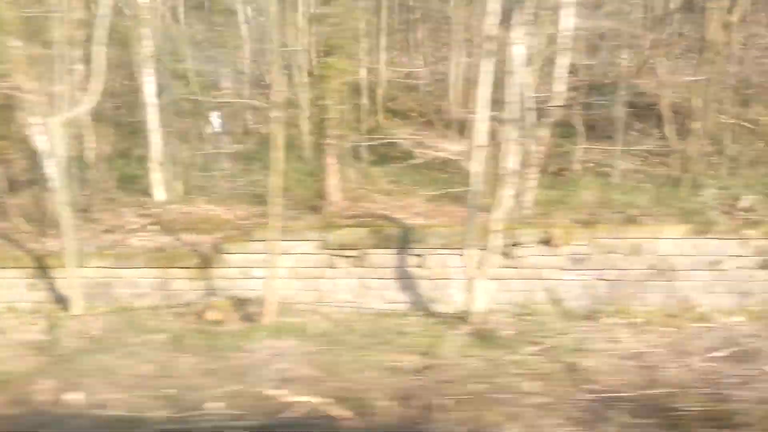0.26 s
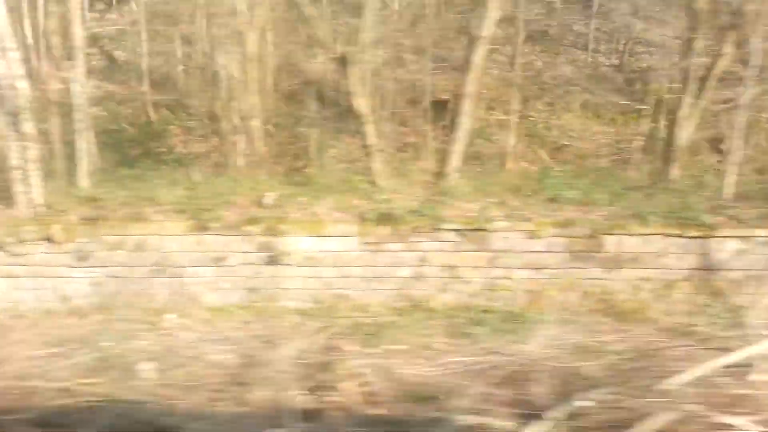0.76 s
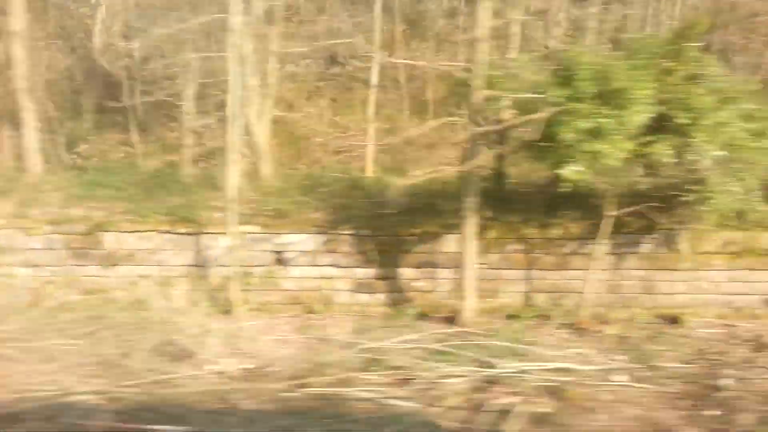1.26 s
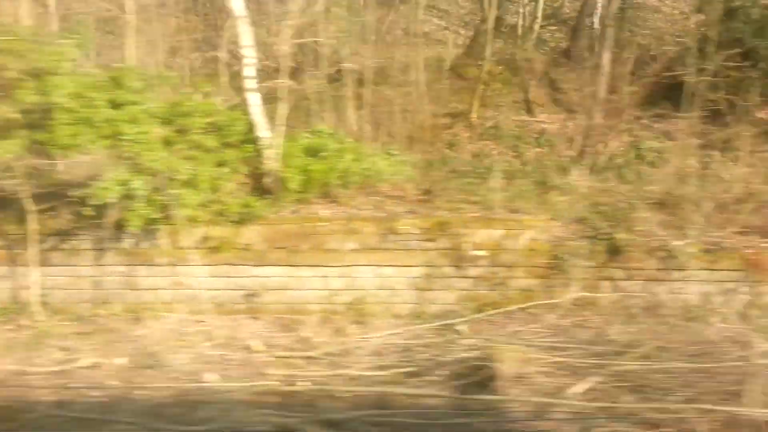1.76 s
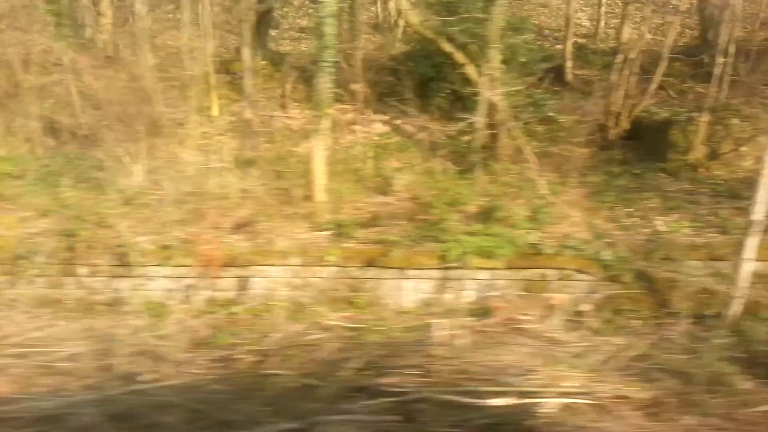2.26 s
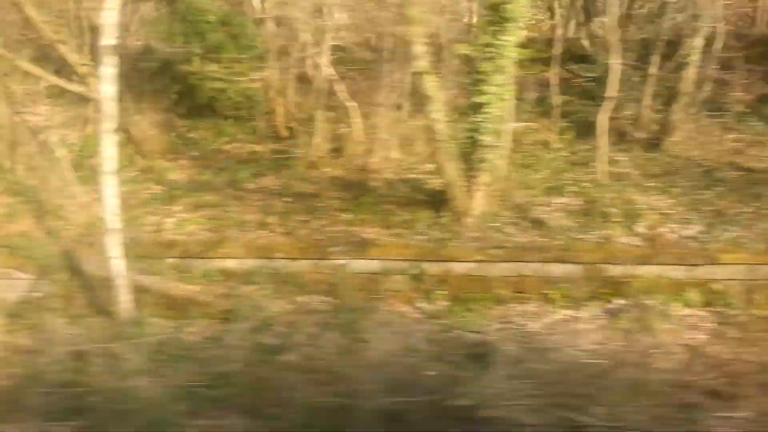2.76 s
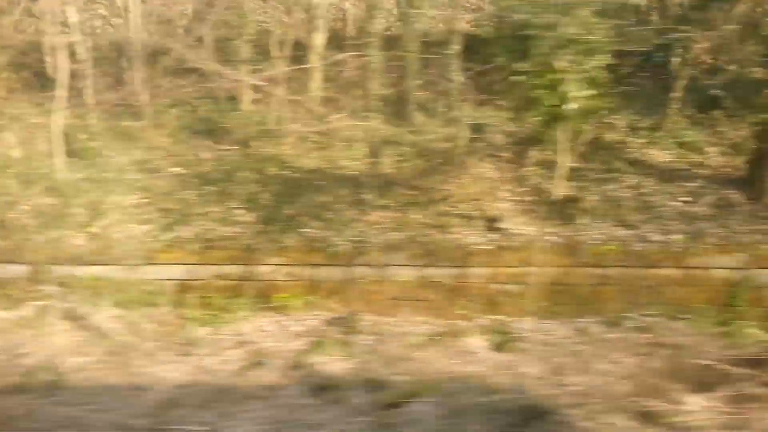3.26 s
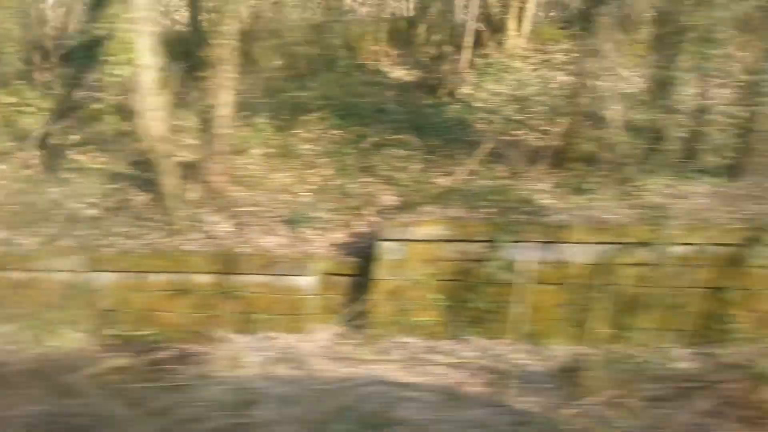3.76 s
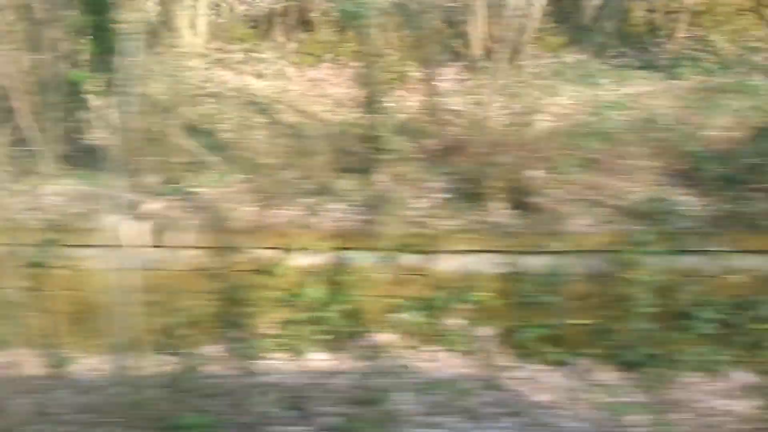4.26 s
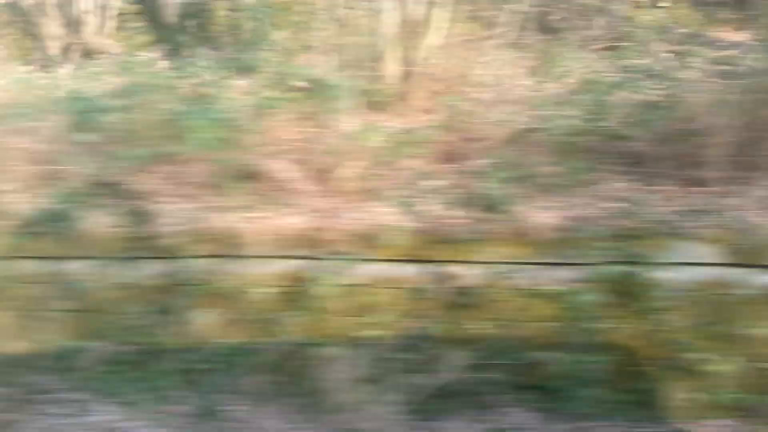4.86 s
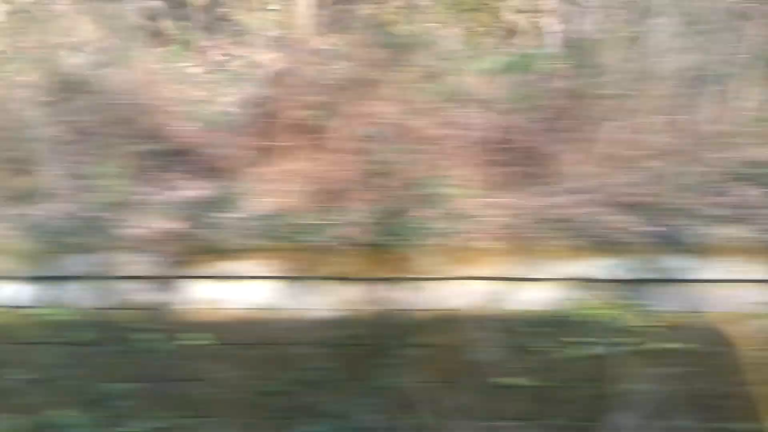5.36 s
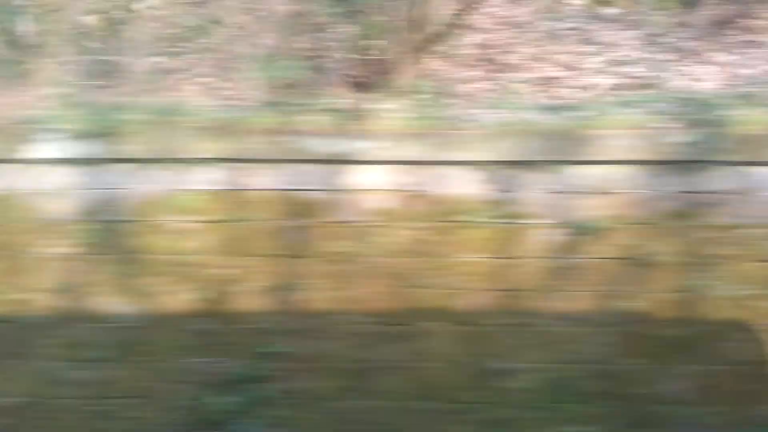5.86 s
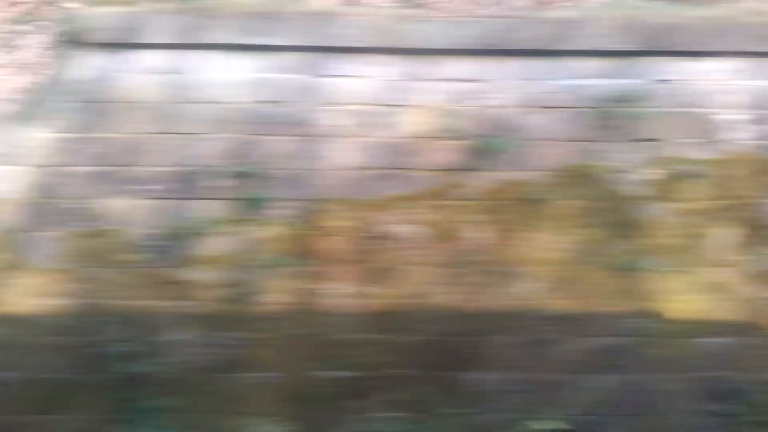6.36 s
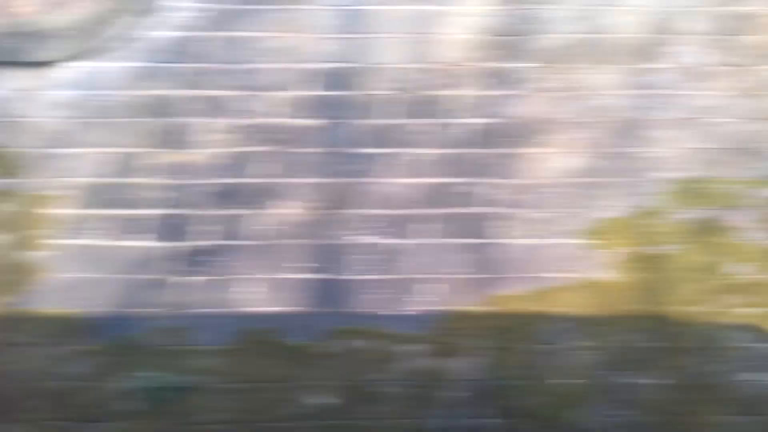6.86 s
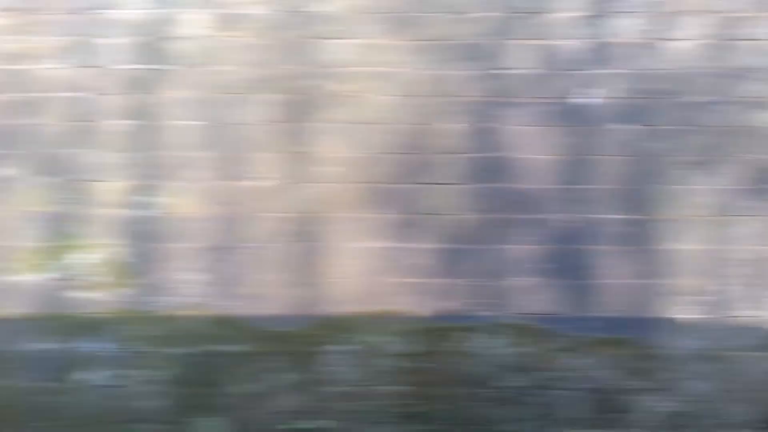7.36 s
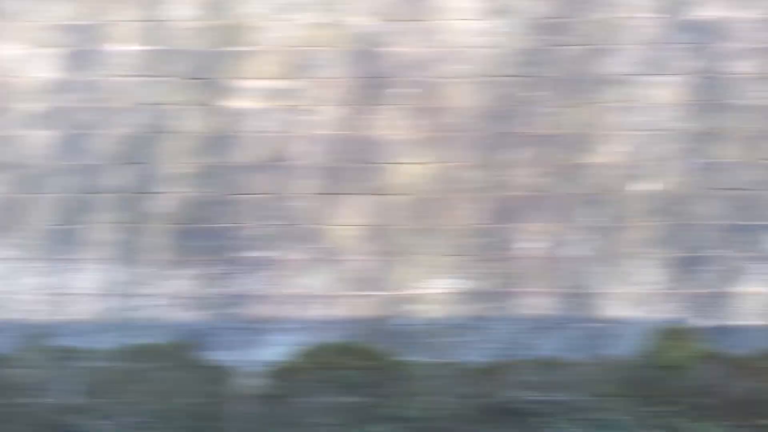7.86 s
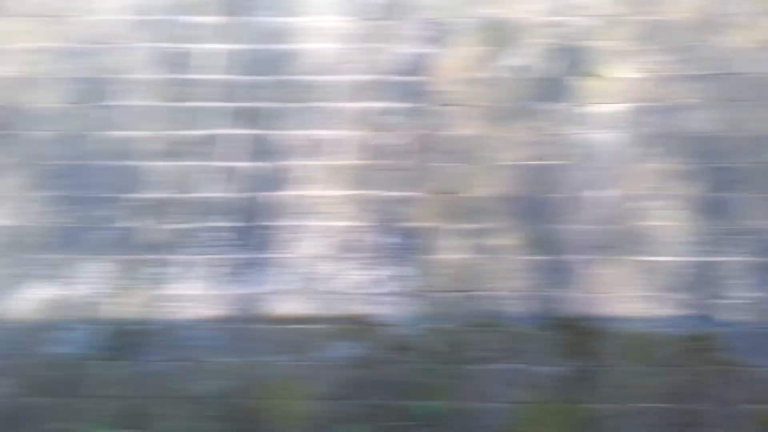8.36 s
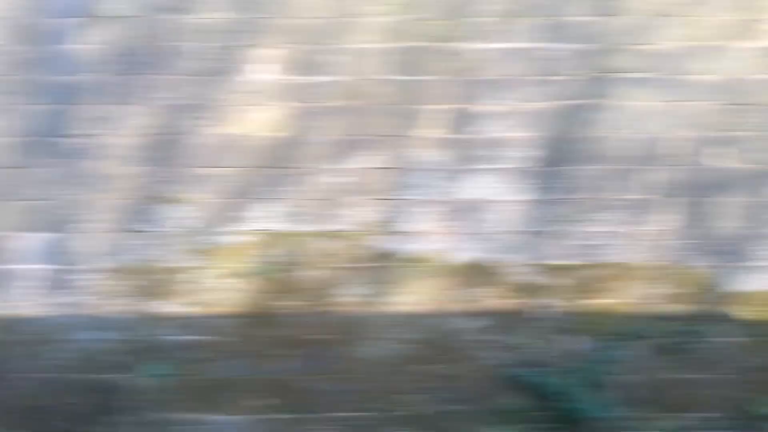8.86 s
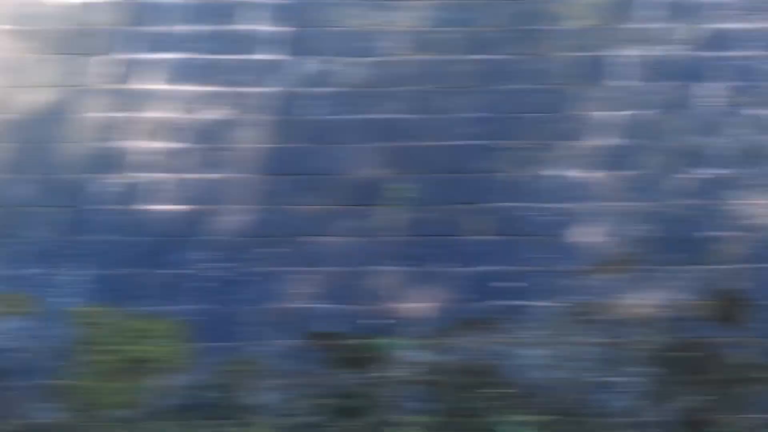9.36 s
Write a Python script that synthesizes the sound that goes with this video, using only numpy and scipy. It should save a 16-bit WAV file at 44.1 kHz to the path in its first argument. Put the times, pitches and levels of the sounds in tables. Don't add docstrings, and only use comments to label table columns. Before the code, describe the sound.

A dense, low-mid rolling roar fills a train carriage passing woods, then a high stone wall. Axles clatter over joints, near ones hard and ringing, far ones soft and blurred. One small snap comes early; later, thin wheel squeaks and faint fizzy trim buzzes surface. The stereo microphone sits inside, slightly distorting on the loudest knocks, and the roar continues to the end.

```python
import sys
import numpy as np
from scipy import signal
from scipy.fft import rfft, irfft, next_fast_len
from scipy.io import wavfile
from scipy.ndimage import uniform_filter1d

SR = 44100
rng = np.random.default_rng(int(sys.argv[2]) if len(sys.argv) > 2 else 0)


def elevation(decibels):
    levels = np.asarray(decibels, float)
    return 10 ** (levels / 20)


def generate_wav(signal):
    frames = np.transpose(np.atleast_2d(signal))
    scaled = np.clip(frames, -1, 1) * 32767
    pcm = np.round(scaled).astype(np.int16)
    wavfile.write(sys.argv[1], SR, pcm)


N = 424241


def evened(x):
    return x / np.sqrt(np.mean(x ** 2) + 1e-20)


def read(points, hz):
    f, value = np.transpose(points)
    return np.interp(np.log(hz + 1), np.log(f + 1), value)


def add(mix, s, sound):
    part = mix[:, round(s * SR):][:, :sound.shape[1]]
    part += sound[:, :part.shape[1]]


# [f/Hz, likeness 0-1]
PORT_LIKENESS = [(40, 0.2), (70, 1), (130, 0.9), (250, 1), (500, 0.85), (1000, 0.45), (2000, 0.11),
                 (4000, 0.47), (8000, 0.33)]
# [f/Hz, left minus right level/dB]
PORT_BALANCE = [(60, -5), (120, -1.5), (250, -2), (530, -1), (1080, -1), (2230, 1), (4600, 0.5)]
# [f/Hz, lead/rad]
PORT_LEAD = [(20, .6), (60, .4), (130, .1), (600, 0.81), (950, 0.31), (1290, 1.54), (1720, 3.4),
             (2330, 4.5), (3010, 6.1), (4050, 8.94), (8000, 55), (16000, 16)]


def ports(left, other, hz):
    same = np.clip(read(PORT_LIKENESS, hz), 0, 1)
    tilt = elevation(read(PORT_BALANCE, hz) / 2)
    delayed = left * np.exp(-1j * read(PORT_LEAD, hz))
    right = same * delayed + np.sqrt(1 - same ** 2) * other
    return np.array([left * tilt, right / tilt])


# [f/Hz, width/Hz, level over the colour/dB]
RESONANCES = [(260, 32.6, 8.5), (349, 68, 4.5), (428, 25, 3), (524, 52, 2), (605, 5.8, -0.5),
              (603.6, 26, 4), (748, 22.3, 5.5), (885, 280, 1.5), (963, 19, 4.5), (1061, 17, 6.5),
              (1340, 71, 2.5), (2310, 90, 3.5), (2897, 120, 4.5), (3696, 240, 6.5), (4720, 720, 4)]


def body_db(hz, colour, ring):
    peaks_db = sum(db / (1 + (2 * (hz - f) / width) ** 2) for f, width, db in RESONANCES)
    return read(colour, hz) + ring * peaks_db


def through_body(size, colour, ring=1):
    hz = np.fft.rfftfreq(size, 1 / SR)
    noise = rfft(rng.standard_normal((2, size)))
    return hz, ports(*noise, hz) * elevation(body_db(hz, colour, ring))


# [t/s, roughness level/dB, wall closeness 0-1]
LINE_SIDE = [(0.0, 0.5, 0.12), (0.7, 1.5, 0), (1.2, -1, 0), (1.5, -1.5, 0), (1.9, 1, 0.07),
             (2.45, -1.5, 0.2), (3.1, 0.5, 0.06), (3.6, 1, 0.22), (4.0, -2, 0.2), (4.9, 0.85, .2),
             (5.55, -1.2, 0.47), (5.9, 2, 0.3), (6.24, -0.4, .8), (6.75, 2, 0.6), (7.8, -0.5, 1),
             (8.8, -0.4, 0.5), (9.15, 3.5, .9), (9.62, -2, 0.2)]
# [start t/s, hold t/s, strength level/dB]
BODY_SHAKES = [(0.0, 0.044, 13), (0.82, 0.35, 8.5), (1.993, .25, 5.5), (2.946, 0.31, 7), (3.39, 0.13, 4),
               (4.125, 0.29, 8), (5.068, 0.33, 8), (5.724, .2, 3), (6.29, 0.26, 4), (7.232, 0.37, 7),
               (8.273, 0.38, 8.5), (8.8, 0.04, -2.5), (9.392, .25, 9)]
# [calm level/dB, share of roughness, level at the wall/dB, share of the shaking]
ROAR_LAYERS = [
    (-31.5, 0.93, 1, 0.8),
    (-19, 1.05, 0, 0.18),
    (-37.5, .4, 4.5, 0.52),
    (-56, 0.35, 4.5, 0.92),
]
# [calm level/dB, share of
# roughness, level at the wall/dB, share of the shaking]
AIR_LAYER = (-58.5, -.6, -8.5, -.3)


def layer_levels(t):
    s, rough_db, wall = np.transpose(LINE_SIDE)
    start, hold, strength_db = np.transpose(BODY_SHAKES)[:, :, None]
    since = t - start
    rise = np.clip(since / 0.035, 0, 1)
    fall = np.exp(-np.maximum(since - hold, 0) / 0.085)
    shake_db = (strength_db * rise * fall).sum(0)
    drivers = [np.ones(len(t)), np.interp(t, s, rough_db), np.interp(t, s, wall), shake_db]
    return np.array(ROAR_LAYERS + [AIR_LAYER]) @ drivers


def band_level(z, hz, lo, hi):
    inside = (hz > lo) & (hz < hi)
    return np.sqrt(2 * np.sum(abs(z.mean(0)[inside]) ** 2)) / (2 * len(hz))


# [f/Hz, level per Hz/dB]
ROAR_COLOUR = [(25, -33.5), (40, -24.5), (100, -18), (155, -9), (225, -8), (400, -7), (600, -3),
               (1000, -9.5), (1420, -20), (3300, -34.5), (5000, -39.5), (6300, -41), (8300, -45),
               (10000, -52), (14500, -58), (15200, -87.5)]


def rolling(patchy_db=1.0, lumpy_db=1.0, flicker_db=0.26, glint_db=4.5):
    hz, z = through_body(next_fast_len(N), ROAR_COLOUR)
    bands_hz = ((120, 350), (350, 1200), (1800, 4500), (5000, 8500), (5000, 8500))
    levels_db = np.array([20 * np.log10(band_level(z, hz, *band)) for band in bands_hz])
    hz, t, frames = signal.stft(irfft(z)[:, :N], SR, nperseg=512, noverlap=384)
    gains_db = layer_levels(t) - levels_db[:, None]

    # (Hz, layer heard there)
    heard = ((230, 0), (500, 1), (1000, 1), (2200, 2), (3800, 2), (6000, 3), (8000, 3), (9600, 4))
    weights = np.array([read([(f, layer == k) for f, layer in heard], hz) for k in range(5)])

    a, b, c = rng.standard_normal((len(t), len(hz), 3)).T
    patches = evened(uniform_filter1d(uniform_filter1d(a, size=20, axis=1), size=6, axis=0))
    lumps = evened(uniform_filter1d(uniform_filter1d(b, size=8, axis=1), size=40, axis=0))
    flicker = evened(uniform_filter1d(c[0], size=5))
    flecks = evened(uniform_filter1d(c, size=8, axis=1))
    field_db = weights.T @ gains_db + patchy_db * patches + lumpy_db * lumps + flicker_db * flicker
    field_db = field_db + glint_db * weights[-1][:, None] * flecks
    return signal.istft(frames * elevation(field_db), SR, nperseg=512, noverlap=384)[1][:, :N]


# [f/Hz, level per Hz/dB]
BLOW_COLOUR = [(25, -53), (118, -28.5), (236, -3.5), (340, -3), (612, 0), (1020, -5), (1400, -8.5),
               (2000, -18.5), (3700, -28), (5500, -42), (8000, -48.5), (10000, -54.5), (15000, -63),
               (20000, -92.5)]


def strike(size=4096, ring=3.93):
    hz = np.fft.rfftfreq(size, 1 / SR)
    cepstrum = irfft(np.log(elevation(body_db(hz, BLOW_COLOUR, ring))))
    causal = np.exp(2 * rfft(cepstrum[:size // 2], size) - cepstrum[0])
    late = causal * np.exp(-2j * np.pi * hz * 32 / SR)
    fade = signal.windows.tukey(2 * size, 0.5)[size:]
    out = irfft(ports(late, late, hz)) * fade
    return out / abs(out).max()


# [f/Hz, rise t/s, t60/s, share of the shudder]
BLOW_SPREAD = [
    (280, 0.0032, 0.32, 0.38),
    (754, 0.0025, 0.23, 0.42),
    (3080, 0.00022, 0.42, 0.32),
    (8000, 0.00041, 0.46, 0.51),
    (10600, .0004, 0.04, 0.12),
]


def joint(s, blow_db, thud_db, clank_db, crack_db, shudder, softness, bounce_db, edge_db, trim_db):
    size = 1 << 15
    hz, z = through_body(size, BLOW_COLOUR, ring=1.4)
    t, out = np.arange(size) / SR, 0

    sway = signal.oaconvolve(rng.standard_normal(size), np.hanning(500), "same")
    bounce = evened(sway) * (1 - np.exp(-t / 0.0059))
    knocks = elevation(bounce_db * (bounce + 0.67 * np.exp(-t / 0.0055)))

    slow_tail = elevation(-14.5 - 60 * t / 0.27)
    levels_db = (thud_db, blow_db, clank_db, crack_db, edge_db)
    for k, (db, (_, rise, t60, share)) in enumerate(zip(levels_db, BLOW_SPREAD)):
        crossover = read([(row[0], j == k) for j, row in enumerate(BLOW_SPREAD)], hz)
        band = evened(irfft(z * crossover))
        after = np.maximum(t - share * abs(shudder), 0)
        fall = elevation(-60 * after / t60)
        if k < len(BLOW_SPREAD) - 1:
            fall = fall + slow_tail
        out = out + elevation(db + trim_db) * band * (1 - np.exp(-t / (rise * softness))) * fall
    return s, out * knocks * (1 - t / t[-1])


# [t/s, blow level/dB, thud level/dB, steel level/dB, shudder t/s]
NEAR_AXLES = [(0.028, -8, -7, -17, 0.017), (1.998, -6, -6.5, -15, 0.012), (2.146, -7, -7.5, -18.5, 0.01),
              (4.13, -9, -16, -16.5, 0.08), (4.281, -2.5, -15, -16, 0.016), (6.286, -5, -19, -15.5, 0.012),
              (6.434, -3.5, -11, -15.5, 0.039), (7.367, -3.8, -11, -15.5, 0.012),
              (7.515, -3, -19, -19, 0.033), (8.451, -5, -4, -18.5, 0.039), (8.6, -3.5, -5, -21, 0.025),
              (9.538, -6, -20, -17, 0.031)]


def near_joints(mix):
    contact = strike()
    for s, blow_db, thud_db, steel_db, shudder in NEAR_AXLES:
        add(mix, s, contact * elevation(blow_db - 3.5) * rng.choice([-1, 1]))
        add(mix, *joint(s, blow_db, thud_db, steel_db, steel_db - 14, shudder,
                        softness=0.51, bounce_db=2.5, edge_db=steel_db - 29, trim_db=-2))


# [t/s, blow level/dB, thud level/dB, steel level/dB, shudder t/s]
FAR_AXLES = [(0.819, -15.5, -23, -26, 0.031), (0.859, -6, -22, -25, 0.066), (1.009, -22, -24, -24.5, 0.05),
             (1.089, -13, -10.5, -32, 0.036), (2.95, -1.5, -34.5, -37, 0.016), (3.08, -7, -24, -25, 0.044),
             (3.249, -26, -11, -39, 0.05), (3.449, -10, -37, -31, 0.085), (3.559, -9, -33, -24.5, 0.13),
             (5.075, -7, -10.5, -20, 0.14), (5.27, -8, -26, -22.5, 0.032), (5.909, -15, -27, -34, 0.067),
             (7.241, -6.5, -8, -18.5, 0.12), (8.33, -1, -11.5, -17.5, 0.065), (8.804, -20, -18, -22, 0.063),
             (9.407, -15, -4.5, -18, 0.16)]


def far_joints(mix):
    for s, blow_db, thud_db, steel_db, shudder in FAR_AXLES:
        add(mix, *joint(s, blow_db, thud_db, steel_db, steel_db - 13.5, shudder,
                        softness=17.0, bounce_db=1.3, edge_db=-88, trim_db=-6))


# [t/s, level/dB, left minus right level/dB]
SNAPS = [
    (1.2264, -4.5, -10),
]


def snaps(mix, ring_hz=1900, spread_s=0.000095):
    t = np.arange(-40, 40) / SR
    snap = -np.sin(2 * np.pi * ring_hz * t) * np.exp(-(t / spread_s) ** 2 / 2)
    for s, db, pan_db in SNAPS:
        add(mix, s + t[0], snap * elevation([[db + pan_db / 2], [db - pan_db / 2]]))


def rubbed(s, hz, db, rise, fall, width_hz, halo=1.0, halo_hz=260):
    t = np.arange(8000 + round(rise * SR)) / SR
    rub = rng.standard_normal((16000, 4)).view(complex).T

    def wander(width):
        pole = np.exp(-np.pi * width / SR)
        slow = signal.lfilter([1], np.poly([pole, pole]), rub)[:, -len(t):].copy()
        return evened(slow.view(float)).view(complex)

    core, fuzz = wander(width_hz), wander(width_hz + halo_hz)
    tone = ((1.2 + 0.54 * core + halo * fuzz[:, ::-1]) * np.exp(2j * np.pi * hz * t)).real
    fade = np.exp(-(np.maximum(t - rise, 0) / fall) ** 2) * (1 - t / t[-1]) ** 0.096
    swell = np.minimum(t / rise, 1) * fade
    return s, elevation(db) * evened(tone + 1.1 * tone[::-1]) * swell


# [t/s, f/Hz, peak level/dB, rise t/s, fall t/s]
TRIM_BUZZES = [(7.59, 10150, -55, 0.021, 0.041), (8.68, 10100, -53, 0.018, 0.055),
               (9.56, 9930, -48.5, .02, 0.04), (4.37, 10200, -59, .02, .03), (5.25, 9860, -54, .02, 0.032),
               (8.3, 10300, -59, 0.043, 0.07)]


def buzzes(mix):
    for row in TRIM_BUZZES:
        add(mix, *rubbed(*row, width_hz=430))


# [t/s, f/Hz, peak level/dB, rise t/s, fall t/s]
WHEEL_SQUEAKS = [(4.4, 3625, -34, .045, .07), (4.42, 3540, -40, .05, .05), (4.49, 3660, -39, .04, .16),
                 (4.715, 2560, -36.5, .025, .04), (4.79, 2560, -38, .025, .035),
                 (6.56, 3490, -39, .07, .06), (6.9, 3040, -38, .03, .035), (7.53, 3650, -35, .02, .03),
                 (7.57, 3730, -41, .03, .06), (7.915, 3640, -31, .035, .055), (7.98, 3495, -35, .04, .03),
                 (8.03, 3575, -39, .02, .04), (8.615, 3725, -34, .025, .05), (8.71, 3620, -38.5, .04, .18),
                 (9.015, 3500, -39, .015, .04), (9.03, 3645, -30, .022, .045), (9.045, 3755, -34, .06, .17),
                 (9.2, 3360, -41, .04, .05)]


def squeaks(mix):
    for row in WHEEL_SQUEAKS:
        add(mix, *rubbed(*row, width_hz=35))


def scene():
    mix = rolling()
    near_joints(mix)
    far_joints(mix)
    snaps(mix)
    buzzes(mix)
    squeaks(mix)
    return mix


def low_pass(x):
    return signal.sosfilt(signal.butter(12, 20000, fs=SR, output="sos"), x)


def record(dry):
    overloaded = np.clip(dry, -1.12, 1.12)
    return low_pass(overloaded)


dry = scene()
out = record(dry)
generate_wav(out)
```